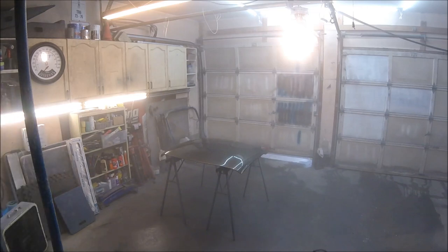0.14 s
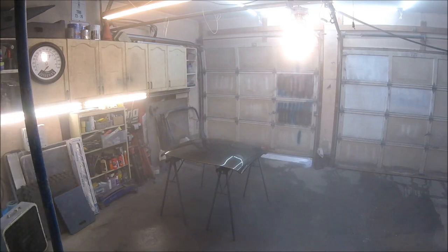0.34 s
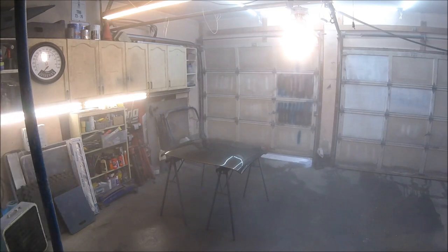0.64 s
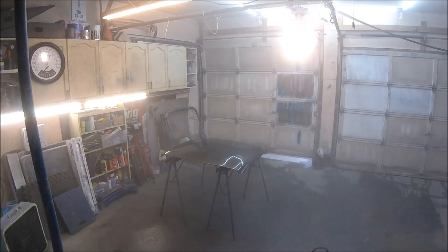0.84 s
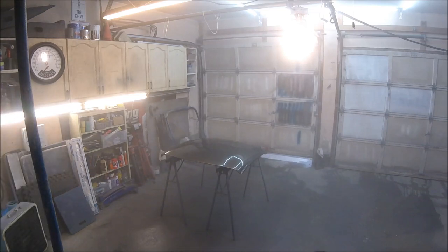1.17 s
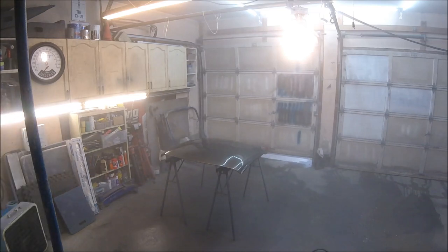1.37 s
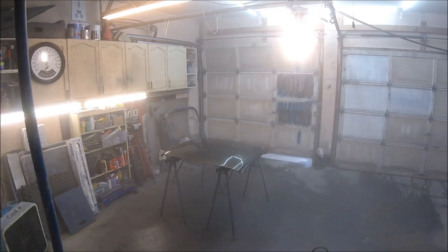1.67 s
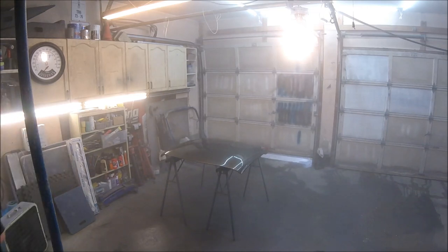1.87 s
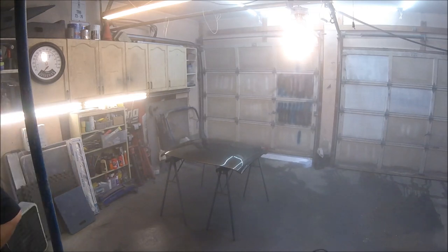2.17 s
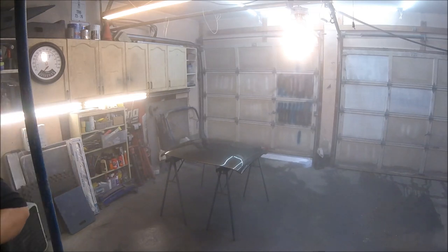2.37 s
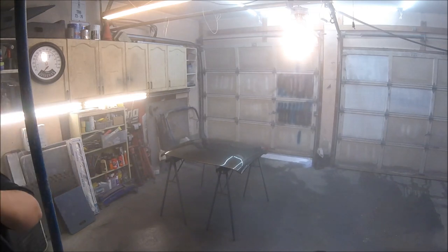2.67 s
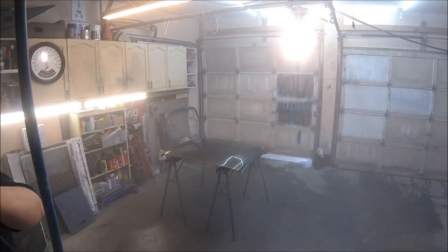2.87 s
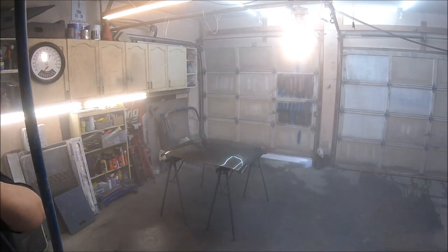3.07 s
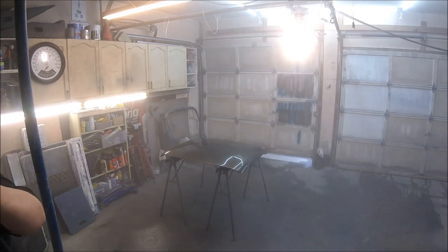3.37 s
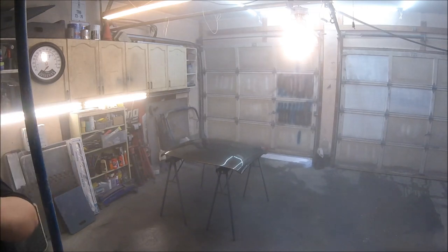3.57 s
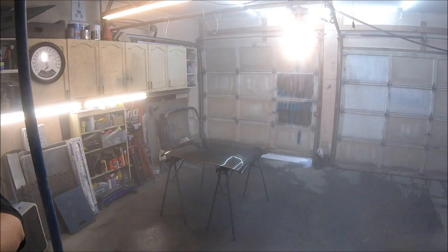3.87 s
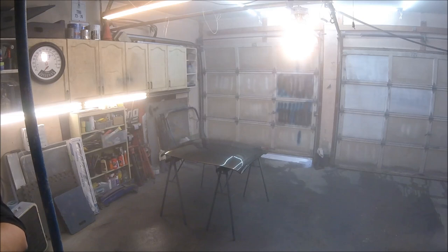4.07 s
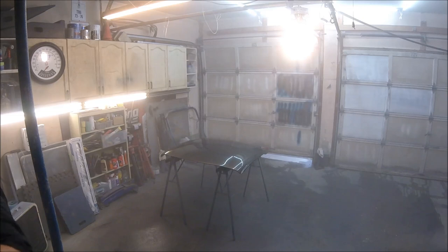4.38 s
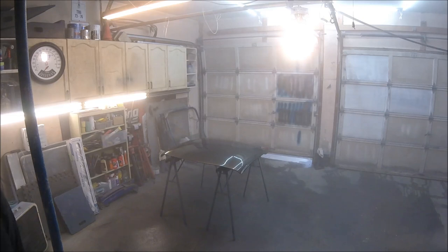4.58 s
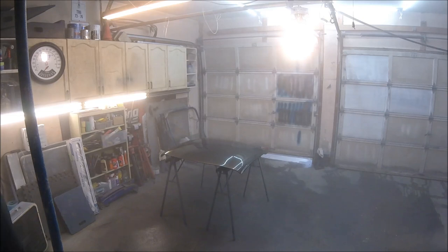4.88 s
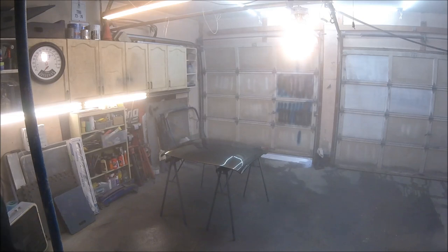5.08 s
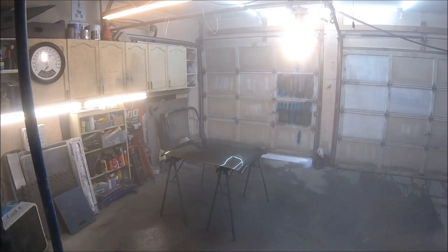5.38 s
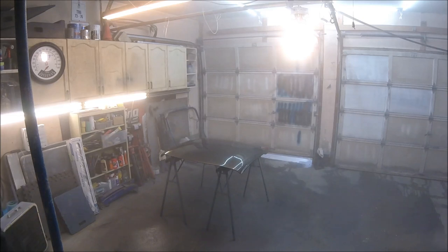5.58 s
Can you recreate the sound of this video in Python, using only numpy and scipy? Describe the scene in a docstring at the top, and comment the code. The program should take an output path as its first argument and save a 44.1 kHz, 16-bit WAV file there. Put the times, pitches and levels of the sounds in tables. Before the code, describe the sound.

A twin-piston air compressor is already running at the start and continues steadily for about five and a half seconds, close to the microphone in a reverberant home garage. It makes a deep, rapid throb of about thirty strokes a second, with motor hum, dense metallic clatter, ringing valve plates, faint steady casing tones and a pulsing rush of intake air. At about 0.5 seconds a spray gun gives one very short, bright hiss, darkening as it shuts, with a dull echo from the far wall and a brief room tail. The microphone's automatic gain drops at the hiss, leaving the compressor quieter, then recovers gradually over the following seconds. At about 2.85 to 3.05 seconds something is handled: small clicks with dry, hollow rings over a dull low rumble. A fainter rumble follows near 3.6 seconds. Then only the compressor remains, still running at the end, its rattle easing slightly.

```python
"""In a garage, a belt-driven twin-piston air compressor runs steadily before the microphone.
Pressure swings thump, struck valve plates ring, crank-locked noise clatters and intake air rushes.
A spray gun gives one short hiss of shaped noise, with a dull echo from the far wall.
Midway something is handled: a few clicks with hollow rings, and a dull rumble.
The microphone's gain control drops at the hiss and creeps back over seconds."""
import sys
import numpy as np
from scipy import signal
from scipy.fft import rfft, irfft, next_fast_len
from scipy.io import wavfile
from scipy.ndimage import uniform_filter1d, minimum_filter1d, map_coordinates

SR = 44100
rng = np.random.default_rng(int(sys.argv[2]) if len(sys.argv) > 2 else 0)


def digitize_waveform(pressure):
    """Quantize a signal to 16-bit integers and store it at the path in sys.argv[1].

    Rows of a 2-D input are taken as channels; values are limited to [-1, 1].
    """
    field = np.atleast_2d(pressure).T
    bounded = np.clip(field, -1, 1)
    quanta = np.round(bounded * 32767).astype(np.int16)
    wavfile.write(sys.argv[1], SR, quanta)


N = 252685  # length [samples]

STROKE_HZ = 30.93  # piston strokes per second; the crank turns at half this rate
TOP_HZ = 13400  # upper band limit at the microphone


def amp(db):
    """Decibels to gain."""
    return 10 ** (np.asarray(db) / 20)


def unit(x):
    """Scale to rms 1."""
    return x / np.sqrt(np.mean(x ** 2) + 1e-20)


def clock():
    """The time of every sample [s]."""
    return np.arange(N) / SR


def along(points, hz):
    """(Hz, value) points read on a log frequency axis."""
    f, v = np.transpose(points)
    return np.interp(np.log(hz + 1), np.log(f + 1), v)


def wobble(rate):
    """A smooth random curve, rate knots a second."""
    knots = rng.standard_normal(int(N * rate / SR) + 4)
    return map_coordinates(knots, [clock() * rate])


def filtered(x, response):
    """x times a response of frequency."""
    size = next_fast_len(N + SR // 2)
    hz = np.fft.rfftfreq(size, 1 / SR)
    return irfft(rfft(x, size) * response(hz), size)[:N]


def coloured(x, spectrum):
    """x given a spectrum, at rms 1."""
    return unit(filtered(x, lambda hz: amp(along(spectrum, hz))))


def tone(turns):
    """A cosine of rms 1, its phase in turns."""
    return np.sqrt(2) * np.cos(2 * np.pi * turns)


def patchy(x, depth_db):
    """Neighbouring bands drift slowly in level; the result has rms 1."""
    bands = signal.stft(x, nperseg=512)[2]
    field = uniform_filter1d(rng.standard_normal(bands.shape), size=6, axis=0)  # across frequency
    field = uniform_filter1d(field, size=60, axis=1)  # across time
    return unit(signal.istft(bands * amp(depth_db * unit(field)), nperseg=512)[1][:N])


# How long the garage rings: (frequency [Hz], time to fall 60 dB [s])
GARAGE_DECAY = [(200, 0.52), (2000, 0.48), (6000, 0.56), (12000, 0.35)]


def garage(x, wet_db):
    """Direct sound plus a noise tail in which each frequency dies at its own speed."""
    hz, t, noise = signal.stft(rng.standard_normal(SR // 2), SR, nperseg=256)
    decay = amp(-60 * t / along(GARAGE_DECAY, hz)[:, None])
    tail = signal.istft(noise * decay, SR, nperseg=256)[1]
    wet = signal.fftconvolve(x, tail / np.linalg.norm(tail))[:N]
    return (x + amp(wet_db) * wet) / np.hypot(1, amp(wet_db))


# Times the object is shifted about: (middle [s], half-length [s], level [dB])
SHUFFLES = [(2.97, .13, -26), (3.6, .12, -35)]
# Spectrum of the dull rumble: (frequency [Hz], relative level [dB per Hz])
RUMBLE = [(50, -12), (85, 1), (103, 6), (135, -5), (300, -5), (450, -14), (700, -21), (2000, -82)]


def shuffle():
    """The object is shifted with a dull noise rumble, under its knocks and once more after them."""
    push = sum(amp(db) * np.exp(-((clock() - s) / length) ** 4) for s, length, db in SHUFFLES)
    return push * coloured(rng.standard_normal(N), RUMBLE)


# Handling knocks: (time [s], pitch ratio, relative ring level [dB], relative click level [dB])
KNOCKS = [(2.8515, 1.03, -17, -21), (2.8575, .99, -22, -27), (2.870, 1.06, -27, -29),
          (2.9595, 1.0, -22.5, -25), (2.972, 1.0, -32, -28), (3.0065, .98, -13.3, -26),
          (3.016, .98, -24, -31), (3.027, .9, -24, -33)]
# Modes of the object: (frequency before the pitch ratio [Hz], relative level [dB], time to fall 60 dB [s])
OBJECT_MODES = [(300, -14, .05), (1010, -6, .04), (1130, -6, .03), (1215, 0, .052), (1310, -11, .035),
                (1735, -11, .05), (1930, -17, .025)]


def knocks():
    """Each contact, and each rebound after it, is a short noise click and a dry hollow ring of modes."""
    t, out = np.arange(SR // 3) / SR, np.zeros(N)
    band = signal.butter(3, [950, 2200], "band", fs=SR, output="sos")
    contact = 1 - np.exp(-t / 0.00012)  # softened onset
    for s, ratio, ring_db, click_db in KNOCKS:
        ring = np.zeros(len(t))
        for hz, db, t60 in OBJECT_MODES:
            mode_db = db + rng.standard_normal() - 60 * t / t60
            ring += amp(mode_db) * np.sin(2 * np.pi * ratio * hz * t)
        click = amp(-60 * t / 0.051) * unit(signal.sosfilt(band, rng.standard_normal(len(t))))
        out[round(s * SR):][:len(t)] += contact * (amp(ring_db) * ring + amp(click_db) * click)
    return garage(out, wet_db=-8)


# Spectrum of the jet: (frequency [Hz], relative level [dB per Hz])
JET = [(700, -16), (1200, -15.5), (2000, -14), (3000, -5), (4300, -4.5), (5400, -3), (5900, 0), (6400, 4.5),
       (7200, -7), (9000, -6.5), (10300, -13.5), (11050, -9), (11500, -21), (13300, -30)]
# one squeeze of the trigger: the air valve opens, stays open and shuts
SQUEEZE_AT_S, OPEN_S, HOLD_S, SHUT_DB_PER_S = 0.4833, 0.037, 0.018, 174
SPRAY_DB = -12.5  # jet before the room is added
JET_BRIGHT_HZ, JET_DARKENS = 5200, 0.66  # the top's extra fall, as a share of the shutting dB
ECHO_S, ECHO_DB = 0.075, -12  # the far wall's delay and gain


def spray_gun():
    """A turbulent jet opens, darkens as it shuts, echoes dully off the far wall and lingers in the room."""
    t = clock() - SQUEEZE_AT_S
    opening = np.sin(np.pi / 2 * np.clip(t / OPEN_S, 0, 1)) ** 2
    shut_db = -SHUT_DB_PER_S * np.maximum(t - OPEN_S - HOLD_S, 0)
    sputter_db = 1.2 * wobble(140)
    jet = opening * amp(SPRAY_DB + shut_db + sputter_db) * coloured(rng.standard_normal(N), JET)
    body = filtered(jet, lambda hz: 1 / (1 + (hz / JET_BRIGHT_HZ) ** 6))
    top = amp(JET_DARKENS * shut_db) * (jet - body)
    echo = amp(ECHO_DB) * np.roll(body, round(ECHO_S * SR))
    return garage(body + top, wet_db=-6.0) + echo


# Drones of the frame: (frequency [Hz], relative level [dB rms])
FRAME = [(49.7, -40), (108.4, -42), (151, -39.5)]
MOTOR_HZ = 58.41  # shaft rate


def motor(shaft_db, mains_db, frame_db):
    """The unbalanced shaft beats slowly against the pump; the mains hum and the frame drones."""
    t = clock()
    shaft = amp(shaft_db) * tone(MOTOR_HZ * (t - .1737))
    mains = amp(mains_db) * tone(120 * t)
    frame = sum(amp(frame_db + db + 1.0 * wobble(2.92)) * tone(hz * t + rng.random()) for hz, db in FRAME)
    return shaft + mains + frame


# Spectrum of the low intake rush: (frequency [Hz], relative level [dB per Hz])
AIR_BODY = [(20, -10), (45, 18.5), (75, 4), (105, 14), (135, -1.5), (195, 11.5), (270, 7), (450, -1),
            (650, 3.5), (900, -6.5), (1200, -6), (1600, -2.5), (2200, 2.5), (2900, -1.5), (4200, -3.5)]
# Spectrum of the high intake fizz: (frequency [Hz], relative level [dB per Hz])
AIR_FIZZ = [(1500, -20.5), (2900, -6.5), (3600, -3), (4400, -2), (5000, -9.5), (5700, -5), (6150, -9),
            (6550, -7), (7000, -10.5), (8600, -18), (10000, -29), (11200, -39), (11800, -82)]


def intake(strokes, body_db, fizz_db, pulsing, edge_hz):
    """Rushing air, a low body and a high fizz of noise, pulses with the strokes."""
    gulp = 1 + pulsing * np.cos(2 * np.pi * (strokes + 0.15))
    body = coloured(rng.standard_normal(N), AIR_BODY)
    body = filtered(body, lambda hz: 1 / np.sqrt(1 + (hz / edge_hz) ** 16))
    fizz = patchy(coloured(rng.standard_normal(N), AIR_FIZZ), depth_db=1.46)
    body_gain = amp(body_db + 0.74 * wobble(5.15))
    fizz_gain = amp(fizz_db + 1.1 * wobble(6))
    return gulp * (body_gain * body + fizz_gain * fizz)


# Spectrum of the rattle: (frequency [Hz], relative level [dB per Hz])
CLATTER = [(250, -48), (400, -39), (750, -2), (1000, -5.5), (1350, -6.5), (1800, -5.5), (2200, -2.5),
           (2700, -10), (3600, -4.5), (4600, -3.5), (5500, -9), (7000, -14), (9500, -31.5), (11200, -43),
           (12000, -78)]
CLATTER_FALL_DB_PER_S = 0.2  # the rattle slowly eases


def clatter(strokes, level_db, unlike_db, uneven_db, slap):
    """The same dense rattle returns every crank turn; unlike cylinders add lines halfway between strokes'."""
    size = 8192  # points in one crank turn
    k = np.arange(size // 2 + 1)  # multiples of the crank rate
    line_db = unlike_db * (k % 2) + uneven_db * (2 * rng.random(len(k)) - 1)
    lines = amp(line_db) * (k * STROKE_HZ / 2 < TOP_HZ)
    lines[[row[0] for row in CASING + SWELLS]] = 0  # the rattle lies between the casing's tones
    turn = irfft(lines * np.exp(2j * np.pi * rng.random(len(k))))
    rattle = map_coordinates(turn, [strokes / 2 % 1 * size], mode="grid-wrap")
    reversal = np.exp(-((2 * strokes + 0.19) % 1) / 0.21)  # louder as the pistons turn round
    easing = amp(-CLATTER_FALL_DB_PER_S * clock())
    return easing * amp(level_db) * coloured(rattle * (1 + slap * reversal), CLATTER)


# Steady tones of the tank and casing: (multiple of the crank rate, relative level [dB rms])
CASING = [(9, -52), (13, -50), (15, -48), (17, -52), (19, -51), (23, -46), (24, -47), (25, -50), (26, -45),
          (27, -52), (28, -42), (29, -49), (30, -46), (31, -52), (32, -49), (33, -51), (35, -48), (36, -41),
          (38, -46), (39, -42), (40, -48), (41, -39), (42, -45), (45, -43.5), (46, -45), (48, -49),
          (52, -49), (53, -45), (54, -46), (55, -50), (58, -50), (60, -51), (62, -48), (64, -51), (69, -51),
          (70, -49), (84, -49), (86, -50), (100, -49), (106, -48), (109, -48), (114, -51), (120, -49),
          (133, -44.5), (139, -47), (140, -44), (144, -47), (146, -46), (148, -46), (150, -44), (164, -44),
          (174, -49), (176, -50), (185, -50), (188, -50), (206, -43), (212, -47), (230, -47), (232, -47),
          (238, -47), (240, -47), (288, -48), (312, -52), (348, -52)]
# Casing tones that swell once and fade: (multiple of the crank rate, time loudest [s], rise [s], fall [s],
# relative resting level [dB rms], swell [dB])
SWELLS = [(34, 5.4, .6, .6, -46, 6), (72, 4.95, 1.7, .7, -58, 17), (122, 1.3, .55, 1.5, -46.5, 7.5),
          (160, .3, 1, 1.1, -51, 12)]


def casing(strokes, level_db, waver_db):
    """Tank and casing tones lock to the crank, one turn in two strokes; each wavers, a few swell and fade."""
    t = clock()
    lines = [(k, db + level_db) for k, db in CASING]
    for k, s, rise, fall, rest_db, swell_db in SWELLS:
        bump = np.exp(-((t - s) / np.where(t < s, rise, fall)) ** 2)
        lines.append((k, rest_db + swell_db * bump))
    return sum(amp(db + waver_db * wobble(6)) * tone(k * strokes / 2 + rng.random()) for k, db in lines)


# Valve rings on every stroke: (delay [s], pitch [Hz], swell time [s], level before the room [dB rms],
# rise [dB per s], timing scatter [s])
VALVES = [(.0142, 2080, .0054, -30.8, .45, .000015), (.0215, 2148, .0077, -44, .3, .00015),
          (.030, 6540, .0025, -42.5, -.15, .000055), (.0043, 6450, .0053, -44, -.15, .00006)]


def valves():
    """Strokes ring the valve plates, one cylinder harder; the low rings slowly gain on the high ones."""
    t, out = np.arange(SR // 12) / SR, np.zeros(N)
    beats = np.arange(-2, int(N / SR * STROKE_HZ) + 1)[:, None] / STROKE_HZ  # stroke times [s]
    cylinder_db = .9 * np.cos(np.pi * STROKE_HZ * beats)  # alternates stroke by stroke
    for delay, hz, swell, db, rise, scatter in VALVES:
        chance = rng.standard_normal((len(beats), 2))  # columns: level, timing
        size = amp(rise * beats + cylinder_db + 1.5 * chance[:, :1])
        rings = size * t * np.exp(-t / swell) * tone(hz * (t + scatter * chance[:, 1:]))
        at = np.round((beats + delay) * SR).astype(int) + np.arange(len(t))
        inside = (at >= 0) & (at < N)
        out += amp(db) * unit(np.bincount(at[inside], rings[inside], N))
    return garage(out, wet_db=-16)


# Partials of the throb: (multiple of the stroke rate, relative level [dB])
THROB = [(1, -2.5), (2, 2), (3, -24), (4, -27), (5, -13.5), (6, -6.5), (7, -17), (8, -10.5), (9, -12.5),
         (10, -11.5), (11, -14)]
# The two gulps of a stroke: (position [share of the stroke], relative size)
GULPS = [(.879, 1), (.355, .75)]


def throb(strokes, level_db, waver_db):
    """A slow pressure swing; two gulps a stroke time its higher partials, and the intake spreads each gulp."""
    out = np.zeros(N)
    for k, db in THROB:
        gulps = -sum(size * np.exp(-2j * np.pi * k * at) for at, size in GULPS)
        spread = .007 * (k - 8) ** 2 + .02 * rng.standard_normal()  # [turns]
        shift = (k > 2) * (np.angle(gulps) / (2 * np.pi) - spread)
        waver = waver_db * min(k / 6, 1) * wobble(3.75)
        out += amp(db + waver) * tone(k * strokes + shift)
    return amp(level_db) * unit(out)


def scene():
    """The pump's rotation drives all of its layers; the sound is the same in both ears."""
    strokes = STROKE_HZ * (clock() - .012) + .0008 * wobble(8)  # strokes made so far, slightly unsteady
    handling = shuffle() + knocks()
    drive = motor(shaft_db=-35.0, mains_db=-39.0, frame_db=-42.0)
    air = intake(strokes, body_db=-23.5, fizz_db=-31.0, pulsing=0.075, edge_hz=3150)
    rattle = clatter(strokes, level_db=-30.0, unlike_db=-3.5, uneven_db=10.0, slap=0.086)
    metal = casing(strokes, level_db=0.5, waver_db=1.46) + valves()
    pump = throb(strokes, level_db=-19.5, waver_db=0.14)
    return np.array([handling + spray_gun() + drive + air + rattle + metal + pump] * 2)


def gain_control(x, limit_db, release):
    """The gain dips just ahead of a sound above the limit and recovers slowly, release in seconds."""
    power = uniform_filter1d(x[0] ** 2, size=round(SR / STROKE_HZ), mode="constant")  # over one stroke
    level_db = 10 * np.log10(np.abs(power) + 1e-12)
    ahead = round(.045 * SR)
    excess = -minimum_filter1d(np.minimum(limit_db - level_db, 0), ahead, origin=-(ahead // 2))
    fade = np.exp(-clock() / release)
    cut_db = np.maximum.accumulate(excess / fade) * fade  # jumps up, then decays
    return x * amp(-uniform_filter1d(cut_db, size=400))


def record(dry):
    """The microphone's gain control and band limit."""
    levelled = gain_control(dry, limit_db=-16.0, release=3.2)
    return np.array([filtered(x, lambda hz: hz < TOP_HZ) for x in levelled])


dry = scene()
out = record(dry)
digitize_waveform(out)
```